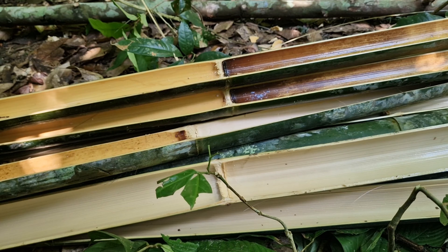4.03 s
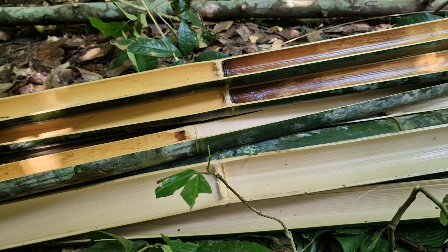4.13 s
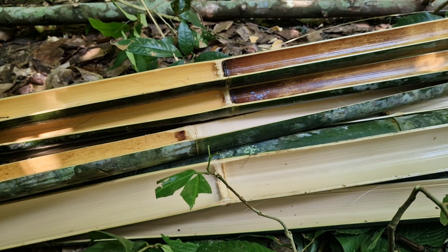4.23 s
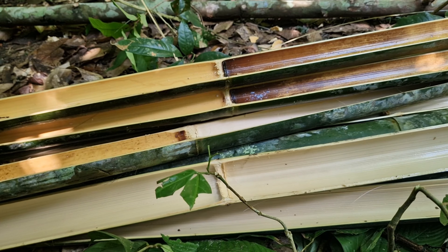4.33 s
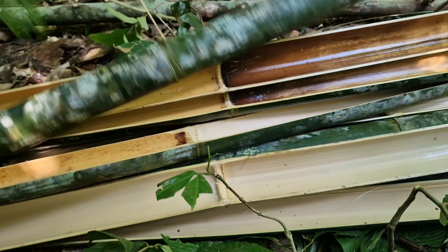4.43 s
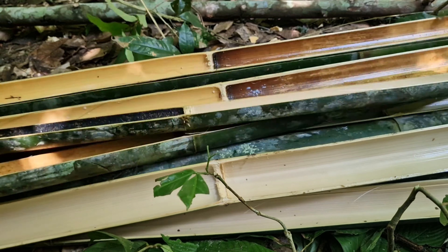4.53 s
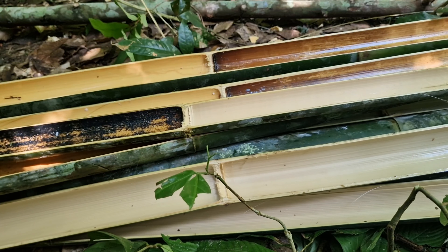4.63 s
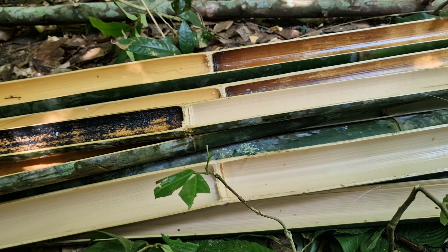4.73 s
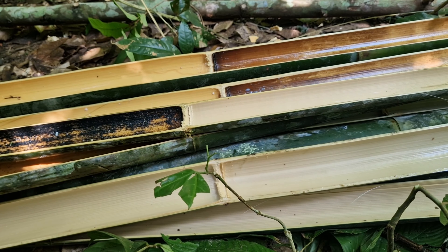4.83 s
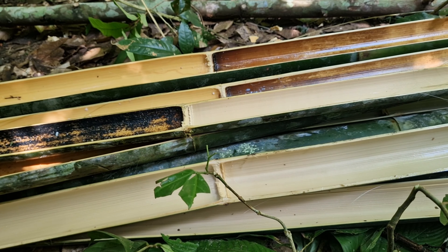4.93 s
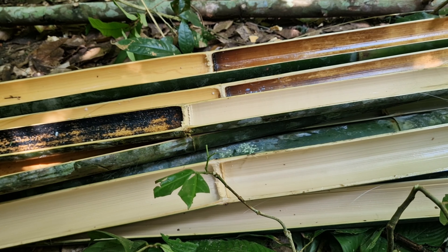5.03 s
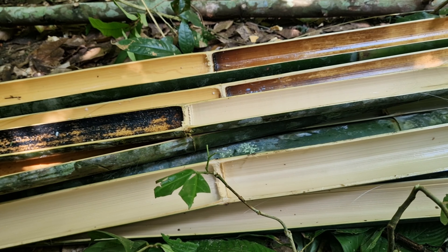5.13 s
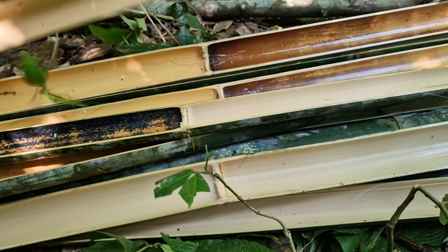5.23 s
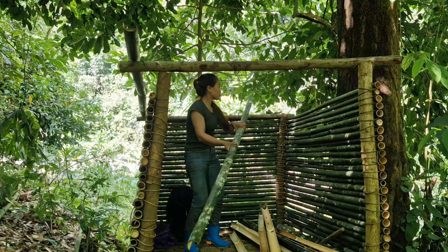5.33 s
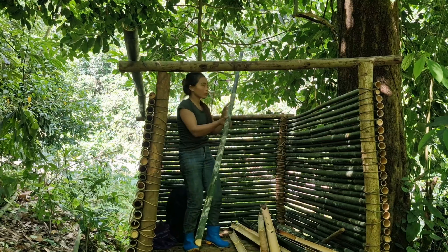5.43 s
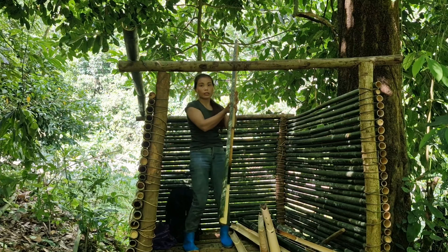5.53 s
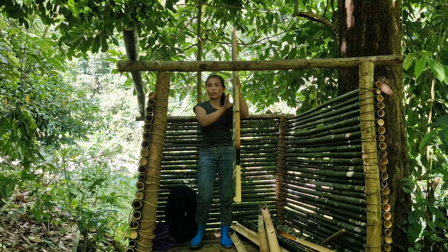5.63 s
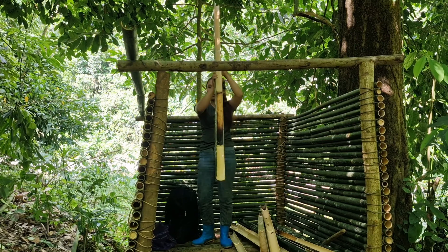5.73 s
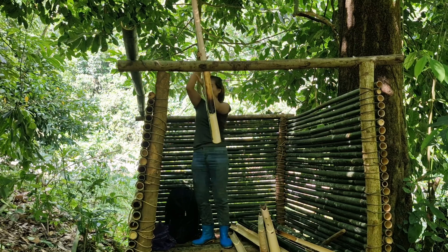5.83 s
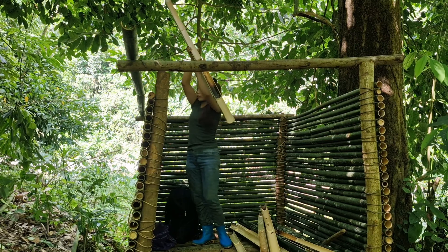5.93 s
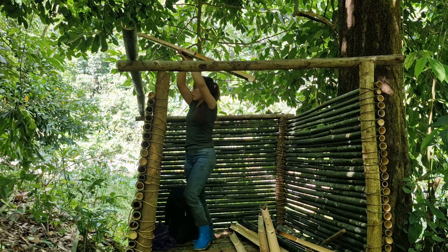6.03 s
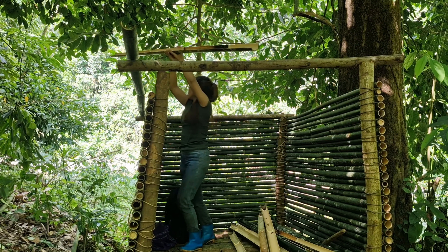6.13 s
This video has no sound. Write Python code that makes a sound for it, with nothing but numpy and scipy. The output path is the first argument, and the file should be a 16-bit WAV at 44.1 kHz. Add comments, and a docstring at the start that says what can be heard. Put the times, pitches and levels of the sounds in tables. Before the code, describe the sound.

Split bamboo lengths are thrown onto a pile with hollow, cracking clatters, over a faint forest stream and insects.

```python
"""Piling up split bamboo in a forest

Lengths of green bamboo are hacked, knocked and thrown onto a pile. Each blow is a swelling rattle of
wood grinding on wood, with sharp cracks in it, and makes the hollow walls ring for a moment.
Behind it are a far stream, leaves, a low rumble and insects. The background hiss sinks after loud
blows, and the whole sound drops away briefly three times."""
import sys
import numpy as np
from scipy import signal
from scipy.fft import rfft, irfft, next_fast_len
from scipy.io import wavfile
from scipy.ndimage import uniform_filter1d

SR = 44100
rng = np.random.default_rng(int(sys.argv[2]) if len(sys.argv) > 2 else 0)


def dump(signal):
    """Clip the signal to [-1, 1] and save it as 16-bit WAV at the path in sys.argv[1]."""
    limited = np.clip(np.atleast_2d(signal).T, -1, 1)
    pcm = np.round(limited * 32767).astype(np.int16)
    wavfile.write(sys.argv[1], SR, pcm)


N = 272097
SPAN = 4096  # samples in one push on the bamboo
BLOWS_END_S = 5.341

# Moments when the sound drops away: start/s, start of return/s, return time/s, depth/dB
DROPOUTS = [(.184, .185, .014, -16), (1.333, 1.42, .05, -60), (5.383, 5.388, .008, -17)]


def undb(db):
    """Turns decibels into a number to multiply by."""
    return 10 ** (np.asarray(db) / 20)


def set_level(sound, db):
    """Scales a sound to an average (RMS) level."""
    return sound * undb(db) / np.sqrt(np.mean(sound ** 2))


def ring(f, hz, width_hz):
    """How strongly something that rings at hz answers each frequency f; 1 at its own note."""
    return 1 / (1 + 1j * (f - hz ** 2 / f) / width_hz)


def waver(rate_hz):
    """A smooth random curve that strays about 1 either side of zero."""
    hold = int(SR / rate_hz)
    steps = np.repeat(rng.standard_normal(N // hold + 1), hold)
    return 1.3 * uniform_filter1d(uniform_filter1d(steps, hold), hold)[:N]


def hiss(hz, width_hz, order=4):
    """A band of noise around hz, different in each ear."""
    size = next_fast_len(N)
    f = np.arange(size // 2 + 1) * SR / size
    band = rfft(rng.standard_normal((2, size))) / (1 + (2 * (f - hz) / width_hz) ** order)
    return set_level(irfft(band, size)[:, :N], 0)


def add_at(track, s, sound):
    """Mixes in a knock so that the middle of its push lands at s seconds."""
    start = int(s * SR) - SPAN // 2
    track[:, start:start + sound.shape[1]] += sound


def stream_and_leaves(spectrum, db):
    """Far water and leaves blend into wide bands of noise that each waver a little."""
    # How alike the two ears hear the forest: f/Hz, likeness (1 = the same)
    ear_likeness = [(60, 0.95), (130, 0.91), (290, 0.26), (640, 0.092), (1410, -0.054), (3100, -0.048),
                    (6820, -0.034), (15000, -0.14)]
    size = next_fast_len(N)
    log_f = np.log(np.arange(1, size // 2 + 2) * SR / size)
    alike_hz, likeness = np.transpose(ear_likeness)
    alike = np.clip(np.interp(log_f, np.log(alike_hz), likeness), -.9, .95)
    hz, gain_db = np.transpose(spectrum)
    colour = undb(np.interp(log_f, np.log(hz), gain_db))
    mid, side = rfft(rng.standard_normal((2, size))) * np.sqrt([1 + alike, 1 - alike]) * colour
    stereo = np.array([mid + side, mid - side])
    sound, shared_swell = 0, waver(2.324)
    for centre in np.log(30 * 4 ** np.arange(6)):  # from 30 Hz up, two octaves apart
        band = np.clip(1 - abs(log_f - centre) / np.log(4), 0, 1)
        sound = sound + irfft(stereo * band, size)[:, :N] * undb(.6 * shared_swell + .9 * waver(9))
    return set_level(sound, db)


def forest(t, blows):
    """The background. Its tone shifts after the second dropout and again when the blows end."""
    # Tone of the forest early, midway and late: f/Hz, relative level/dB
    early_tone = [(18, -69), (30, -30.5), (95, -17.5), (112, -3.5), (134, -3.5), (189, -8), (287, -9),
                  (364, -12), (1320, -14.5), (7270, -26.5), (16000, -41)]
    middle_tone = [(18, -63), (30, -35), (95, -13), (131, -2), (170, -7.5), (319, -17), (666, -18.5),
                   (1100, -20.5), (1500, -18), (2500, -22.5), (5900, -29), (10000, -34), (16000, -41.5)]
    late_tone = [(18, -49), (30, -31), (134, 0.5), (252, -9.5), (394, -12), (461, -4.5), (666, -11),
                 (913, -9), (2010, -14.5), (7470, -25), (16000, -37)]
    # Rise and fall of the low rumble: t/s, gain/dB
    rumble_curve = [(0, 2), (.8, -0.5), (1.2, -6), (1.85, 0), (2.5, -6), (3.1, -3), (3.45, 0.5),
                    (4.0, -0.5), (4.75, -2), (5.25, -3)]
    later = t >= DROPOUTS[1][1]
    early = stream_and_leaves(early_tone, db=-42)
    middle = stream_and_leaves(middle_tone, db=-43) + insects() + wisps(t)
    background = np.where(later, middle, early)
    rumble = signal.sosfiltfilt(signal.butter(2, 231, fs=SR, output="sos"), background)  # below 231 Hz
    # After the second dropout, earlier blows no longer hold the hiss down.
    sink_db = np.where(later, hiss_sink_db(blows * later), hiss_sink_db(blows))
    rumble_db = np.interp(t, *np.transpose(rumble_curve))
    background = (background - rumble) * undb(sink_db) + rumble * undb(rumble_db)
    return np.where(t < BLOWS_END_S, background, stream_and_leaves(late_tone, db=-41.5))


def bamboo(push, hard_hz, note_hz, hollow_db, splinter_db, thud_db, ring_length):
    """A push sets off ringing walls, bright splinters and a low thud; higher hard_hz is brighter."""
    # Ringing of the walls and air of the split tubes: f/Hz, width/Hz, level/dB
    wall_notes = [(330, 190, 8.5), (450, 69, 12), (616, 390, 5), (790, 470, -2.5), (1010, 330, -7),
                  (1110, 410, -7.5), (1370, 170, -3.5), (1520, 180, -4.5), (1900, 920, -1),
                  (2010, 300, -0.5), (3000, 630, -13), (3240, 1500, 2.5), (4200, 1700, -5)]
    f = np.arange(1, SPAN + 2) * SR / (2 * SPAN)
    alike = .9 / (1 + (f / 500) ** 3)  # both ears hear nearly the same lows
    drive = rfft(push, 2 * SPAN)
    drive[1] = alike * drive[0] + np.sqrt(1 - alike ** 2) * drive[1]
    walls = undb(hollow_db) * ring(f, note_hz, 0.059 * note_hz / ring_length)  # the piece's own note
    for hz, width_hz, db in wall_notes:
        hz = hz * (1 + 0.04 * rng.standard_normal())  # every piece is cut a little differently
        contact_db = -6.5 * np.log2(hz / hard_hz) ** 2  # harder contact wakes higher notes
        ear_phase = np.exp(1j * min((hz / 700) ** 2, np.pi) * rng.uniform(-1.09, 1, (2, 1)))
        gain = undb(db + contact_db + 1.5 * rng.standard_normal())
        walls = walls + gain * ear_phase * ring(f, hz, width_hz / ring_length)
    walls = walls / (1 + 1j * f / (3.87 * hard_hz)) ** 2  # green wood swallows the treble
    walls = walls * f / (f - 200j)  # short pieces give off no deep bass
    splinters = ring(f, 6300, 5500) * ring(f, 8300, 21000) * (1 + 0.34 * ring(f, 6740, 740))
    thud = ring(f, 222.4, 280) ** 2 * f / (f - 80j)
    colour = 0
    for part, db in ((walls, 0), (splinters, splinter_db), (thud, thud_db)):
        power_gain = np.mean(abs(drive * part) ** 2) / np.mean(abs(drive) ** 2)
        colour = colour + undb(db) * part / np.sqrt(power_gain)  # even out the parts, then apply db
    return irfft(drive * colour)


def cracks():
    """A sharp contact: one hard tick, reaching the ears a little apart, then a spray of tiny ones."""
    # Sharp contacts: t/s, tick level/dB, note/Hz, splinters/dB
    contacts = [(0.139, -25, 1430, -5.5), (0.8866, -5, 930, -10), (0.9065, -1, 1200, -12),
                (1.0696, -10, 970, -18), (1.219, -25, 990, -5), (1.2413, -18, 410, -8),
                (1.9658, -3, 1440, -13), (2.0287, -7.5, 1500, -7), (2.1233, -14.5, 2510, -12),
                (2.1373, -26, 2220, -5), (2.3662, -39, 430, 0), (2.8688, -5.5, 1700, -30),
                (2.8984, -12.5, 2240, -22), (2.9185, -14, 700, -23), (2.9703, 0, 1900, -17),
                (3.009, -9.5, 1460, -25), (3.6781, -6, 766, -12), (3.6832, -8, 1510, -19),
                (3.7338, -5, 680, -15), (3.7485, -11.5, 2350, -1), (3.841, -16, 600, -11),
                (4.5181, -8, 806, -16), (4.5295, -11, 2400, -6), (4.5442, -17, 670, 3.5),
                (4.606, -25, 2090, -8), (4.874, -40, 2120, 4), (5.2577, -6, 1520, -10),
                (5.2678, -9, 1900, -26), (5.2795, -5.5, 1790, -20), (5.3166, 0.5, 1900, -21)]
    track = np.zeros((2, N + 2 * SPAN))
    ms = (np.arange(SPAN) - SPAN // 2) / SR * 1000
    for s, db, note_hz, splinter_db in contacts:
        spray = .5 * rng.standard_normal((2, SPAN)) * np.exp(-abs(ms) / 1.44) * (ms > 0)
        tick = np.array([np.roll(ms == 0, lag) for lag in rng.integers(-9, 10, 2)])
        crack = bamboo((tick + spray) * undb(db), hard_hz=0.81 * note_hz, note_hz=note_hz,
                       hollow_db=10.3, splinter_db=splinter_db, thud_db=-13.5, ring_length=0.42)
        add_at(track, s, crack)
    return track[:, :N]


def rattles():
    """Wood grinds on wood in many uneven slips that swell, fade and trail off as the pieces settle."""
    # Bursts of grinding: peak t/s, push level/dB, note/Hz, rough half length/ms, splinters/dB
    grinds = [(0.876, -25, 1750, 9.4, -11), (0.889, -20.5, 920, 6.7, -6.5), (0.912, -19, 486, 6.4, -8.5),
              (1.069, -22, 540, 11.1, -8), (1.118, -34.5, 1160, 17, -11.5), (1.141, -40, 1060, 18, -8),
              (1.219, -45, 730, 16, -8), (1.247, -37, 330, 15, -5.5), (1.273, -40, 880, 25, -4),
              (1.302, -40.5, 1470, 19, -14.5), (1.644, -44, 795, 12, -14), (1.954, -29.5, 1370, 8.7, -12),
              (1.968, -16.5, 1297, 7.3, -12), (1.995, -33, 596, 23, -8.5), (2.023, -24.5, 455, 8.7, -9.5),
              (2.041, -28.5, 395, 12, -12), (2.067, -21.5, 1470, 11.4, -6.5),
              (2.085, -25.5, 1900, 9.7, -10.5), (2.117, -29, 690, 18.5, -16.5), (2.145, -38, 397, 8.9, -19),
              (2.864, -28.5, 990, 13, -7.5), (2.875, -20, 796, 10, -16.5), (2.918, -28, 790, 20, -14.5),
              (2.961, -30, 900, 8.7, -11), (2.972, -15.5, 1440, 8.4, -11), (2.989, -25, 1650, 10.5, -17),
              (3.006, -26, 1700, 12.5, -19), (3.021, -26, 1210, 9.6, -14.5), (3.039, -32, 1540, 10.6, -16),
              (3.074, -39, 755, 22, -12), (3.105, -49, 477, 14, -12), (3.668, -23.5, 2160, 10.6, -9.5),
              (3.688, -20.5, 820, 10.8, -12), (3.721, -24, 1445, 11.4, -14), (3.743, -26.5, 597, 16, -9),
              (3.77, -37, 1520, 10, -11), (3.792, -27.5, 800, 15, -15), (3.814, -28.5, 1600, 11, -6.5),
              (3.842, -29.5, 544, 12.5, -14), (3.867, -38.5, 706, 15, -9), (3.914, -40.5, 720, 19, -7.5),
              (3.94, -43.5, 523, 14, -19), (4.443, -20.5, 780, 10.5, -7), (4.46, -15.5, 960, 7.1, -9.5),
              (4.473, -22, 1520, 6.7, -12.5), (4.495, -21.5, 514, 11, -13.5),
              (4.522, -23.5, 900, 9.1, -8.5), (4.546, -32, 1620, 19, -10), (4.559, -29.5, 450, 17, -8.5),
              (4.579, -30, 1000, 10.2, -10.5), (4.609, -38.5, 530, 11.6, -11),
              (4.658, -42, 790, 10.6, -8.5), (5.254, -27, 1380, 11.7, -9), (5.264, -24, 1900, 13, -16),
              (5.285, -23, 900, 9.6, -20), (5.3, -29, 1650, 12, -13), (5.312, -24.5, 1330, 7.4, -11),
              (5.325, -17, 1110, 7.3, -12.5), (5.335, -20, 1330, 6.2, -15)]
    # Starting values for each piece that lands: from t/s, hardness/Hz, thud/dB, hollowness/dB
    pieces = [(0, 1400, -13, 5), (1.0, 990, -13.5, 13), (1.2, 1200, -9.5, 9), (1.9, 1150, -9, 5),
              (2.05, 1210, -14, 1.5), (2.8, 1030, -12, 4), (2.95, 1210, -8.5, 5.5), (3.6, 1150, -10, 4),
              (3.76, 1110, -15, 5.5), (4.4, 1190, -6, 2.5), (5.2, 1520, -11, 9), (5.275, 1290, -10.5, 5)]
    settle_db, settle_ms = -21, 25.7
    track = np.zeros((2, N + 2 * SPAN))
    ms = (np.arange(SPAN) - SPAN // 2) / SR * 1000
    for s, db, note_hz, half_ms, splinter_db in grinds:
        slope_ms = half_ms * np.where(ms < 0, 0.87, 1.08)  # swells faster than it fades
        swell = np.exp(-(abs(ms) / slope_ms) ** 1.8)
        settle = undb(settle_db) * (ms > 0) * ms / settle_ms * np.exp(1 - (ms / settle_ms) ** 2)
        shape = swell + settle
        slips = undb(2.5 * np.minimum(rng.exponential(1, SPAN // 16), 3).repeat(16))
        push = rng.standard_normal((2, SPAN)) * slips * shape
        push = push * undb(db) * np.sqrt(np.mean(shape ** 2) / np.mean(push ** 2))
        _, hard_hz, thud_db, hollow_db = [piece for piece in pieces if piece[0] <= s][-1]
        extra_splinter_db = splinter_db + 12
        # Higher notes and more splinters go with harder contact.
        hard_hz = hard_hz * (note_hz / 1000) ** 0.27 * np.exp(0.0943 * extra_splinter_db)
        hollow_db -= 0.3 * extra_splinter_db  # fewer splinters, more ring
        thud_db -= 0.14 * (db + 25)  # softer rattles are more thud
        rattle = bamboo(push, hard_hz, note_hz, hollow_db, splinter_db, thud_db, ring_length=0.83)
        add_at(track, s, rattle)
    return track[:, :N]


def hiss_sink_db(blows):
    """How far the hiss is turned down: it follows the power of the blows and recovers slowly."""
    deepest_db, halfway_db, recover_s = -4.5, -38, 0.33
    decay = np.exp(-1 / (recover_s * SR))
    recent_power = signal.lfilter([1 - decay], [1, -decay], np.mean(blows ** 2, axis=0))
    return deepest_db * recent_power / (recent_power + undb(halfway_db) ** 2)


def insects():
    """Far insects make a thin, high band of noise that gently swells and fades."""
    return hiss(hz=7400, width_hz=500, order=2) * undb(-59.5 + 1.6 * waver(2.5))


def wisps(t):
    """Faint, brief puffs of very high hiss."""
    # Puffs: t/s, level/dB, half length/ms
    puffs = [(1.93, -53, 25), (2.35, -61, 25), (4.69, -55.5, 20), (5.068, -52, 18)]
    loudness = sum(undb(db) * np.exp(-((t - s) * 1000 / half_ms) ** 2) for s, db, half_ms in puffs)
    return hiss(hz=13300, width_hz=4600) * loudness


def scene():
    """Bamboo blows in front of the forest; they stop suddenly and the forest carries on."""
    t = np.arange(N) / SR
    blows = (rattles() + cracks()) * np.clip((BLOWS_END_S - t) / 0.0012, 0, 1)
    return blows + forest(t, blows)


def record(dry):
    """Dips the level at each dropout, rounds off loud peaks and removes the highest treble."""
    t = np.arange(N) / SR
    gain_db, top_hz = 0, 15900
    for start_s, return_s, fade_s, depth_db in DROPOUTS:
        falling = np.clip((t - start_s) / .002, 0, 1)
        still_down = np.clip(1 - (t - return_s) / fade_s, 0, 1) ** 2
        gain_db = gain_db + depth_db * falling * still_down
    rounded = np.tanh(dry * undb(gain_db))
    return signal.sosfilt(signal.ellip(10, .2, 70, top_hz, fs=SR, output="sos"), rounded)


dry = scene()
out = record(dry)
dump(out)
```